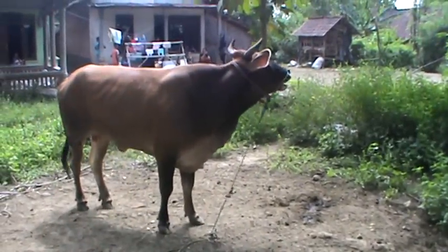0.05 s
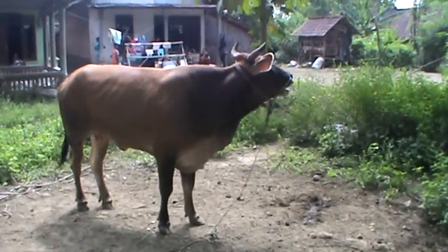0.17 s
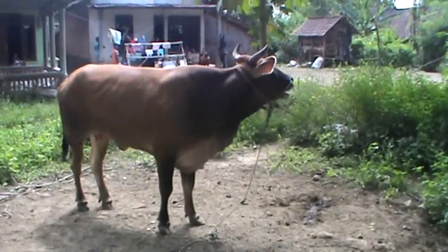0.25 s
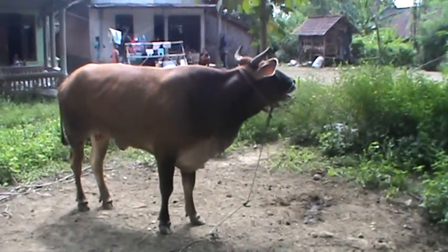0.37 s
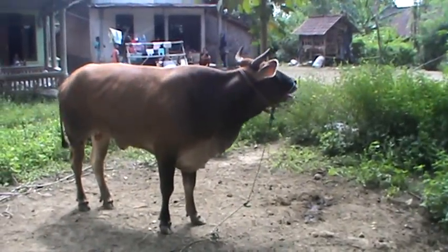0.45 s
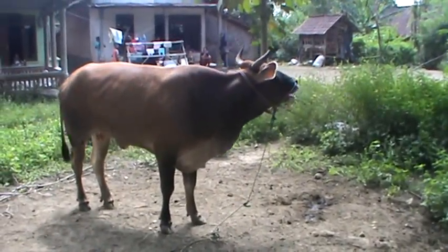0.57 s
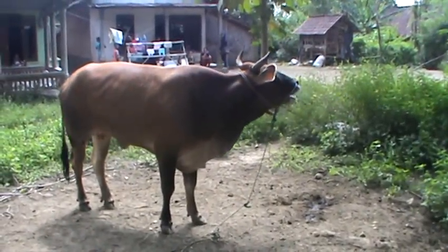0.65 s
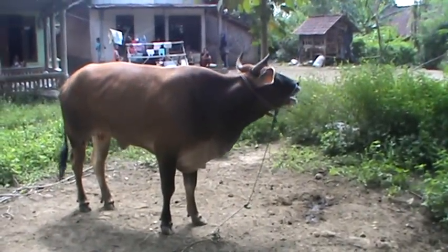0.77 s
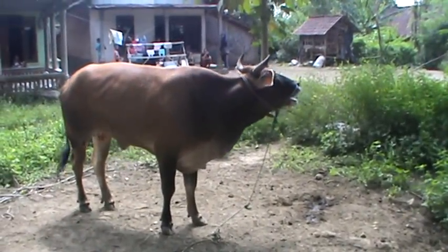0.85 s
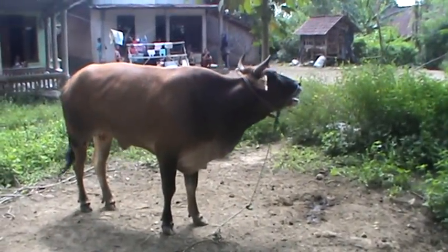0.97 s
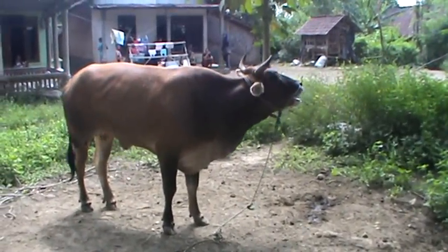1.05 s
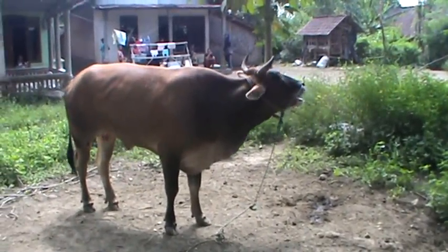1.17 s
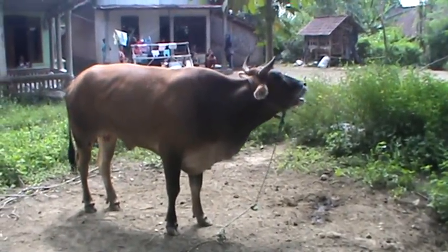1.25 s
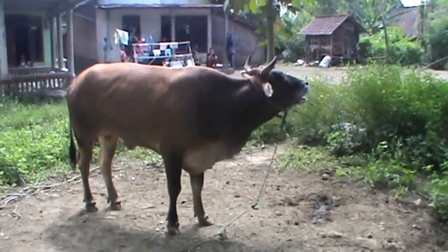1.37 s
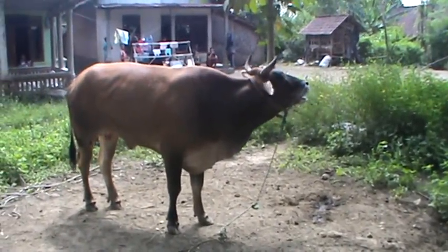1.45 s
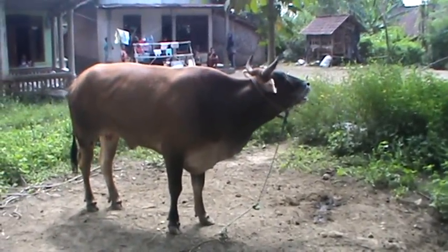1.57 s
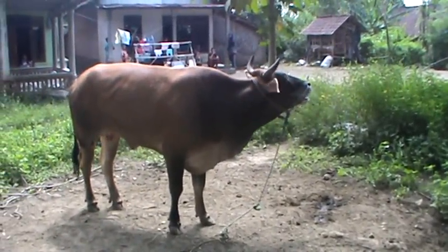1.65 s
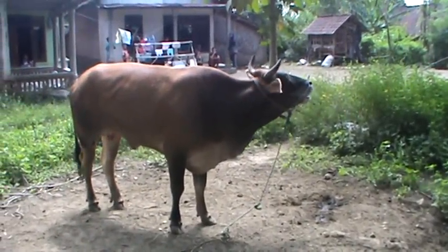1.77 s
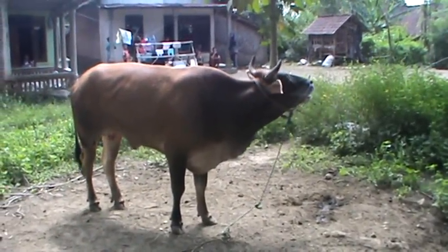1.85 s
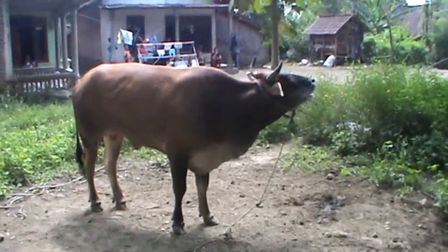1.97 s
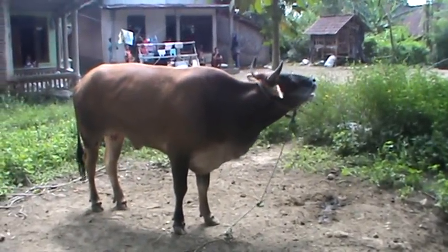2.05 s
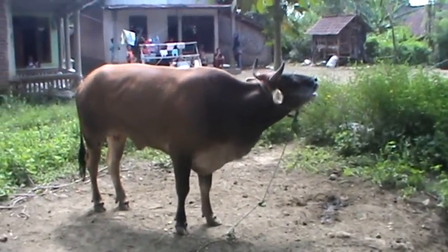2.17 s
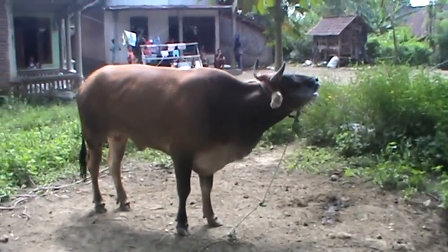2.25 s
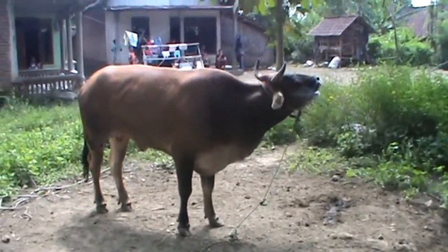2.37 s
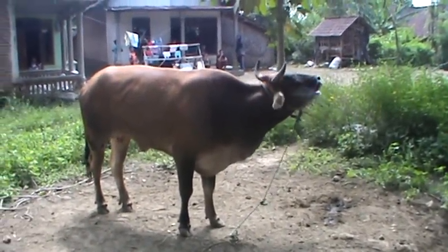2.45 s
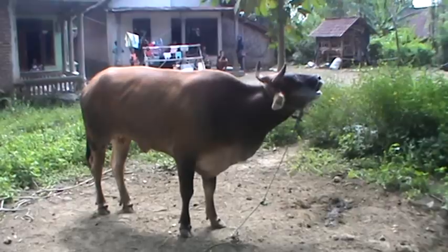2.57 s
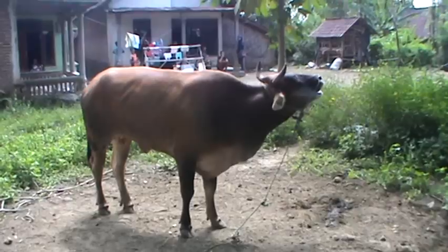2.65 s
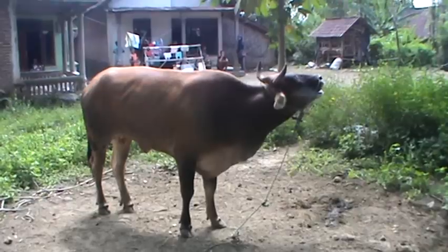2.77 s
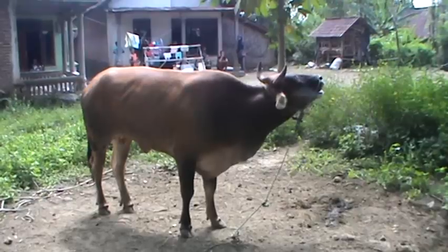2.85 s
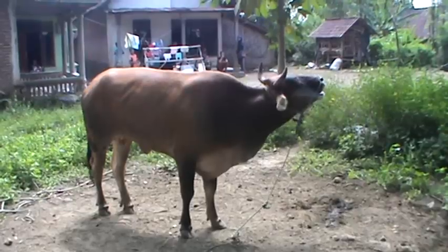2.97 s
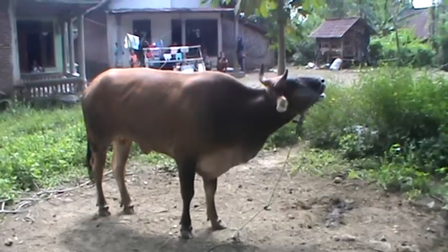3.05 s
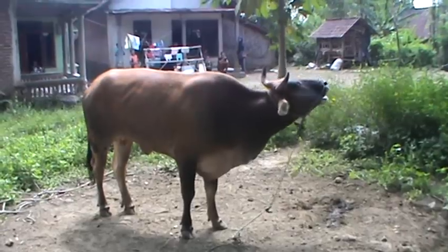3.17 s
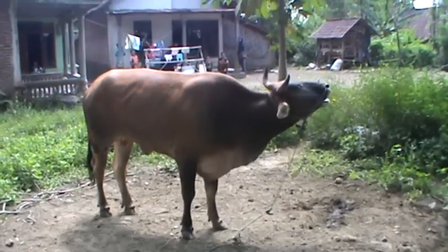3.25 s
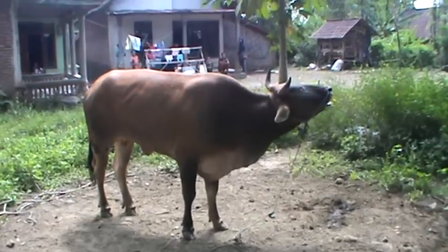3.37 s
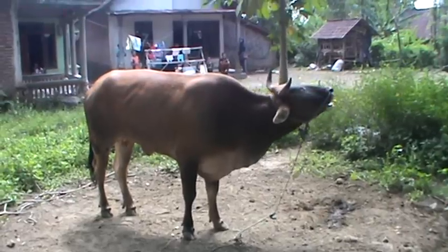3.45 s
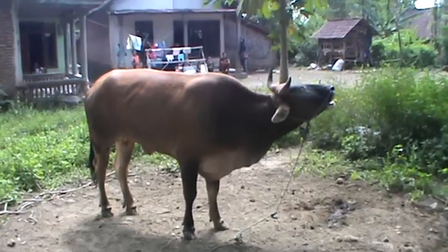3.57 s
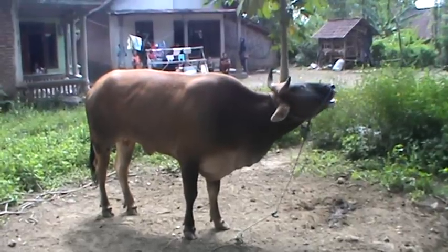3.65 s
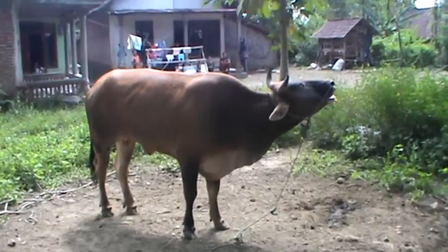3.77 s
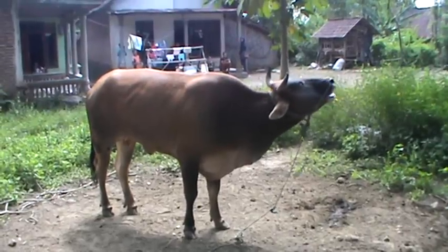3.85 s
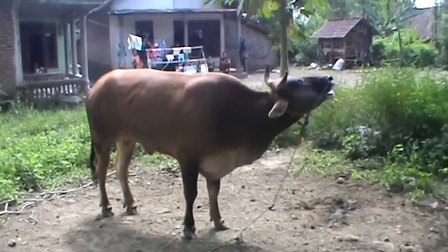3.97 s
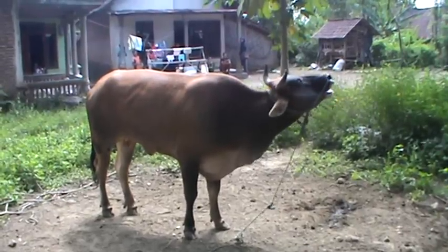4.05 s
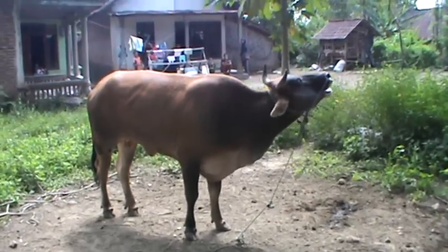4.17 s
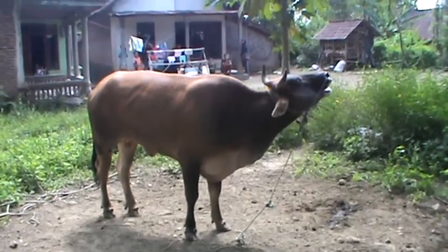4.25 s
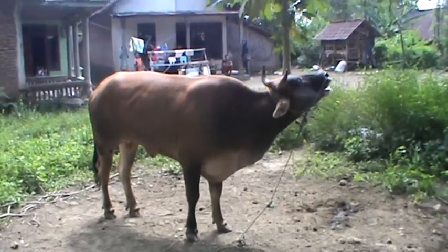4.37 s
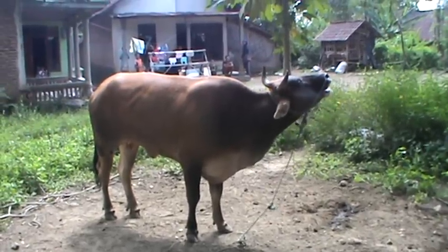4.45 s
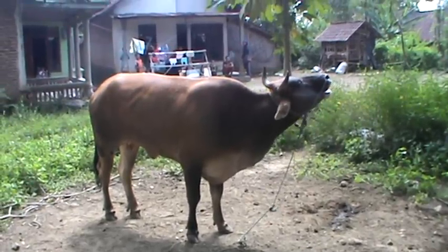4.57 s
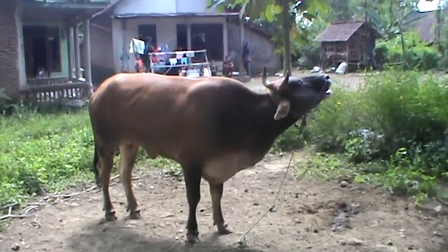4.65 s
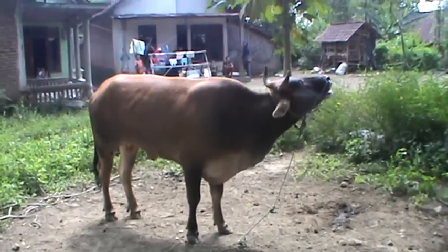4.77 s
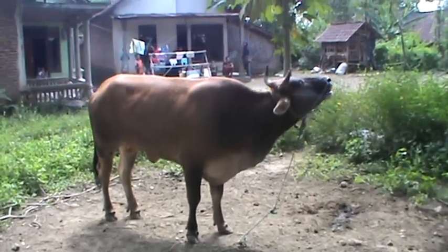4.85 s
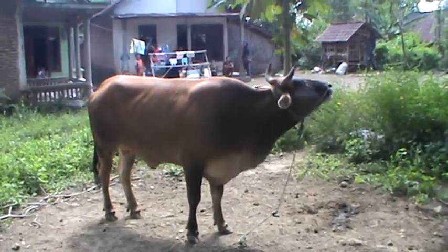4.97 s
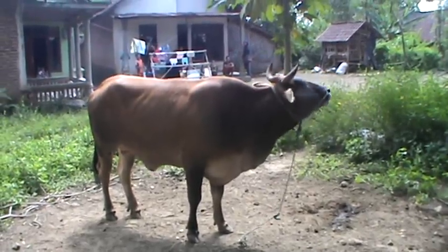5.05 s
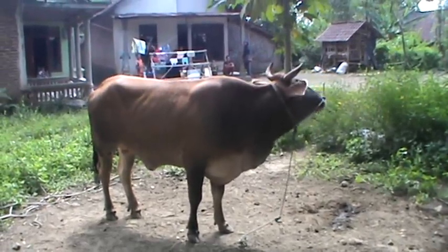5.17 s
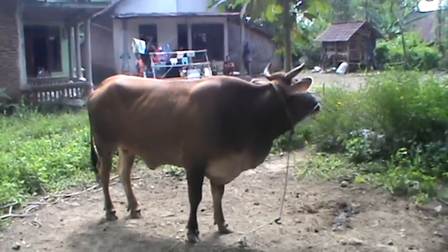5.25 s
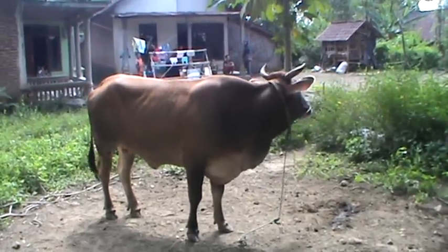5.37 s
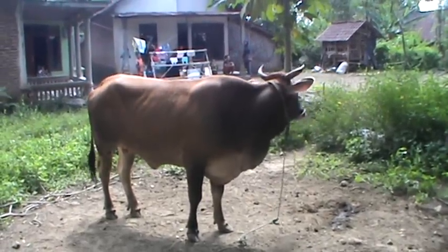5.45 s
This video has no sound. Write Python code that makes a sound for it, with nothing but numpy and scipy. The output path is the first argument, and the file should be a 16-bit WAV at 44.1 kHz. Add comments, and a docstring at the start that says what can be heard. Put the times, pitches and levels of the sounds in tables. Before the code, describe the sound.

In a quiet yard among houses, a cow lets out a single call of almost five seconds, slightly off to one side of the microphone. It starts high and strained, roughens, then falls into a low, wavering moo with a ragged break and a last swell. Faint, rasping bird chirps come from the bushes partway through. After the call cuts off, only soft open air and a faint high camera whine remain.

```python
"""A cow bellows once in a village yard, off the axis of the camera's microphone. Her vocal folds vibrate
in two ways and ring her throat: the voice leaps to a high trumpet, turns hoarse, drops to a low moo,
breaks again, then sags and swells before it stops. House walls answer faintly over the outdoor hush.
A small bird gives rasping, falling chirps in the bushes. Close to the microphone, a thin whine from
the camera itself sweeps slowly up and down."""
import sys
import numpy as np
from scipy import signal
from scipy.fft import rfft, irfft, next_fast_len
from scipy.io import wavfile
from scipy.ndimage import uniform_filter1d, map_coordinates

SR = 44100
rng = np.random.default_rng(int(sys.argv[2]) if len(sys.argv) > 2 else 0)


def output_pcm(signal):
    """Save a mono or channel-first signal as 16-bit PCM at the path in sys.argv[1].

    Samples are clipped to [-1, 1] before scaling.
    """
    pcm = np.clip(np.atleast_2d(signal).T, -1, 1) * 32767
    wavfile.write(sys.argv[1], SR, np.round(pcm).astype(np.int16))


N = 243285

# The folds' slow vibration, phrase by phrase. Each row: time in seconds, pitch in Hz.
TRUMPET_UNDERTONE = [(0, 153.5), (.1, 174.8), (.4, 198.7), (1.25, 196.9), (1.36, 177.8)]
FIRST_MOO_PITCH = [(1.42, 163.9), (1.544, 144.6), (1.608, 130.5), (1.676, 127.1), (1.856, 125.4),
                   (2.022, 131), (2.26, 147)]
BREAK_PITCH = [(2.45, 173.3), (2.621, 163.2)]
LONG_MOO_PITCH = [(2.73, 125.1), (2.756, 127.8), (2.94, 123.4), (3.116, 124.3), (3.302, 131.2),
                  (3.584, 123.9), (3.8, 120.5)]
CLOSING_PITCH = [(3.84, 114.5), (3.944, 100.5), (4.048, 97.4), (4.148, 99.47), (4.198, 103.8),
                 (4.408, 145.6), (4.534, 142.6), (4.632, 128.6), (4.722, 105.5), (4.79, 77.5)]
# Ways the folds vibrate. Each named row: weights in dB of slow vibration, fast vibration and rasp.
REGISTERS = { "split": (0, -5, -9), "trumpet": (-52, 0, -36), "strained": (-21, 0, -15),
             "hoarse": (-14, 0, -2.5), "roar": (-4, -3, 2), "moo": (0, -60, -26), "gruff": (0, -40, -15),
             "ragged": (0, -25, -10)}
# The voice slips between them. Each row: midpoint in seconds, length in seconds, new register.
SLIPS = [(0, .01, "split"), (0.121, 0.056, "trumpet"), (.385, .05, "hoarse"), (.76, .05, "roar"),
         (.815, 0.068, "hoarse"), (1.189, 0.078, "strained"), (1.327, 0.042, "split"), (1.44, .06, "gruff"),
         (1.6, .1, "moo"), (2.18, .14, "ragged"), (2.275, 0.053, "roar"), (2.738, .06, "gruff"),
         (2.821, 0.074, "moo"), (3.809, .05, "gruff"), (3.95, .08, "moo"), (4.222, .1, "gruff"),
         (4.361, .04, "ragged"), (4.6, .1, "gruff")]
# Jaw and tongue move two resonances. Each row: time in seconds, mouth in Hz, nasal in Hz.
VOWEL = [(1.4, 1093, 1483), (1.6, 1030, 1560), (1.85, 1020, 1640), (2.05, 1040, 1490), (2.2, 933, 1698),
         (2.6, 957, 1660), (3.1, 816, 1720), (3.35, 905, 1690), (3.6, 994, 1880), (3.8, 948, 1742),
         (3.92, 1032, 1700), (4.05, 920, 1736), (4.45, 908, 1560), (4.8, 1022, 1620)]
# The high register. Each entry: relative level of a harmonic in dB, from the fundamental up.
TRUMPET_HARMONICS = [11, -4, -7, -21.5, -13.5, -8.5, -31, -18.5, -30, -29, -24, -29, -36.5, -30.5, -14.5,
                     -24, -23.5, -31, -24, -19, -29.5, -25.5]
# Spectra of the slow pulses, the turbulence at the folds and the mouth's radiation.
# Each row: frequency in Hz, gain in dB.
PULSE_SPECTRUM = [(120, 3.5), (600, -9), (1100, -21), (1800, -30.5), (2200, -27.5), (2800, -32.5),
                  (3300, -30), (4500, -53), (5500, -36.5), (7000, -46)]
RASP_SPECTRUM = [(150, 5.5), (500, 1.5), (2000, -4), (3000, -1), (3900, 6), (4550, -5.5), (5300, -15.5),
                 (7000, -9), (12000, -16)]
RADIATION = [(150, -6.5), (200, -18), (240, 7.5)]
# Resonances of throat and muzzle. Each row: centre in Hz, width in Hz, gain in dB.
THROAT = [(242.7, 60.6, 6.5), (376, 140, -5.5), (530.8, 51.8, 11), (751.4, 32, 5.5), (861.4, 131, 1),
          (1045, 34.9, 10), (1280, 420, -9.5), (1512, 36, 2), (1640, 86, -4), (2008, 41, 1),
          (2183, 71, -15.5), (2550, 91, -23), (2707, 70, -23.5), (3320, 260, -32.5), (4462, 390, -12.5),
          (5800, 2100, -22), (8500, 830, -46), (10800, 3300, -43.5)]
# Bands of the voice. Each named row: lower edge in Hz, upper edge in Hz.
VOICE_BANDS = {"chest": (180, 340), "throat": (340, 650), "mouth": (650, 1150), "nasal": (1150, 2350),
               "edge": (2350, 12500)}
# The voice's body, below the mouth band, phrase by phrase. Each row: time in seconds, level in dB.
TRUMPET_LEVEL = [(0.0, -16.5), (0.09, -12), (0.684, -10), (0.798, -19), (0.838, -12), (1.26, -10),
                 (1.408, -15.5), (1.42, -21.5)]
FIRST_MOO_LEVEL = [(1.45, -22), (1.594, -12), (1.732, -18.5), (1.826, -18.5), (2.124, -12), (2.2, -19)]
BREAK_LEVEL = [(2.24, -21), (2.5, -20.5), (2.72, -19)]
LONG_MOO_LEVEL = [(2.76, -14), (2.852, -19), (3.358, -13.5), (3.57, -20), (3.676, -16), (3.77, -14),
                  (3.83, -18)]
CLOSING_LEVEL = [(3.86, -22), (3.898, -17.5), (4.254, -21), (4.368, -10.5), (4.418, -18), (4.592, -12),
                 (4.708, -18.5), (4.73, -15), (4.764, -20), (4.822, -44), (4.86, -36)]
# The breaking voice catches, lifting its body. Each row: time and half width in seconds, gain in dB.
CATCHES = [(2.281, .017, 7), (2.355, .014, 5), (2.485, .012, 3), (2.58, .022, 7), (2.63, .024, 7),
           (2.71, .014, 5)]
# The mouth band, early and late, and the nasal band. Each row: time in seconds, level in dB.
MOUTH_EARLY = [(0.0, -18.5), (0.35, -29.5), (0.69, -29), (0.74, -23), (1.26, -31), (1.39, -19),
               (1.57, -28.5), (1.61, -16.5), (1.75, -22), (2.05, -19), (2.21, -35), (2.29, -19)]
MOUTH_LATE = [(2.6, -22), (2.64, -21), (3.21, -28), (3.25, -20.5), (3.39, -22.5), (3.46, -31.5),
              (3.52, -23), (3.79, -30), (3.83, -17.5), (3.98, -31.5), (4.15, -28), (4.28, -15.5),
              (4.37, -35), (4.45, -19), (4.57, -21), (4.59, -31.5), (4.68, -18.5), (4.86, -55.5)]
NASAL_LEVEL = [(0.0, -25.5), (0.12, -25.5), (0.36, -21.5), (0.49, -26.5), (1.12, -27), (1.24, -25.5),
               (1.77, -38), (2.45, -27), (2.76, -33.5), (2.94, -41.5), (3.36, -30.5), (3.53, -34),
               (3.79, -25.5), (3.91, -35.5), (4.17, -35.5), (4.29, -29), (4.32, -33), (4.66, -32),
               (4.68, -27.5), (4.86, -53)]
# Weight of the lowest resonance within the body. Each row: time in seconds, gain in dB.
CHEST_WEIGHT = [(0, -6), (1.7, -15.5), (2.15, -7.5), (2.4, 1), (2.75, -2), (3.1, 6), (3.3, -9.5), (3.55, 1),
                (3.76, 14), (3.87, -2), (4.2, 6), (4.32, 3.5), (4.55, 0.5), (4.7, 4)]
# The weak fundamental radiating from the neck. Each row: pitch in Hz, gain in dB.
NECK = [(98, -39), (122, -41), (145, -49.5), (175, -43.5)]
# The cow at the two microphone ports. Each row: frequency in Hz, left's lead in radians.
PORT_PHASE = [(60, .1), (250, 0.83), (750, 1.14), (2000, 1.06), (4200, 1.07), (9000, 0.32)]
# Her balance between the ports. Each row: frequency in Hz, left minus right in dB.
PORT_BALANCE = [(200, 0.5), (600, -0.4), (740, 2), (830, 0.5), (1100, -3.5), (2400, -1.5), (4400, -2)]
# Outdoor hush and hiss. Each row: frequency in Hz, relative level in dB.
HUSH_SPECTRUM = [(25, -9), (80, -11.5), (270, -4), (480, -11), (720, -9), (1200, -17.5), (3000, -20.5),
                 (6000, -21), (12000, -24), (14000, -17.5), (15000, -35.5)]
# Stereo image of the hush. Each row: frequency in Hz, left-right likeness from 0 to 1.
HUSH_LIKENESS = [(60, 0.51), (130, 1), (290, 0.62), (640, 1), (1410, 1), (3100, 1), (6820, 0.096),
                 (15000, 1)]
# Fundamental of the camera's whine. Each row: time in seconds, level in dB.
WHINE_LEVEL = [(0, -54), (1.5, -59.5), (2.9, -54.5), (4.9, -56.5), (5.2, -52), (5.5, -50)]
# Its lower overtones. Each row: multiple of the fundamental, offset in Hz, rms level in dB.
WHINE_OVERTONES = [(1, 330, -71), (2, 0, -69), (3, 0, -76)]
# Reverberation among the houses. Each row: frequency in Hz, seconds to fall 60 dB.
WALL_DECAY = [(200, 0.7), (1500, 0.71), (7000, 0.15)]
# The bird's chirps. Each row: start in seconds, relative level in dB.
CHIRPS = [(1.714, -49.5), (1.92, -44.5), (2.0792, -46.5), (2.1893, -41.5), (2.3532, -42), (3.8107, -39.5),
          (4.0328, -36), (4.2063, -37), (4.351, -36), (4.463, -35.5), (4.6253, -35), (4.7315, -32),
          (4.8492, -33.5)]
SIDES = np.array([[.5], [-.5]])  # splits a difference between left and right


def amp(db):
    """Decibels to gain."""
    return 10 ** (np.asarray(db) / 20)


def unit(x):
    """x at rms 1."""
    return x / np.sqrt(np.mean(x ** 2) + 1e-20)


def along(points, hz):
    """Interpolate (Hz, value) points on a log axis."""
    f, v = np.transpose(points)
    return np.interp(np.log(hz + 1), np.log(f + 1), v)


def curves(*tables):
    """Join tables end to end; one value per sample for each column after the time."""
    s, *cols = np.vstack(tables).T
    return [np.interp(np.arange(N) / SR, s, c) for c in cols]


def bump(s, width_s):
    """A bell of height 1 around the time s."""
    return np.exp(-((np.arange(N) / SR - s) / width_s) ** 2)


def wobble(rate):
    """A smooth random curve, rate knots a second."""
    return map_coordinates(rng.standard_normal(int(N * rate / SR) + 4), [np.arange(N) * rate / SR])


def filtered(x, response):
    """x through a complex frequency response."""
    m = next_fast_len(N + SR // 2)
    return irfft(rfft(x, m) * response(np.fft.rfftfreq(m, 1 / SR)), m)[..., :N]


def band(hz, lo, hi, order=24):
    """Gain of a steep band-pass."""
    return (1 - 1 / (1 + (hz / lo) ** order)) / (1 + (hz / hi) ** order)


def steady(x, seconds):
    """x with its running rms held at 1."""
    size = int(seconds * SR)
    return x / np.sqrt(np.abs(uniform_filter1d(uniform_filter1d(x ** 2, size), size)) + 1e-12)


def pitches():
    """Slow and fast pitch of the folds in Hz; the fast one scoops up and slackens as breath is spent."""
    t = np.arange(N) / SR
    low_hz, = curves(TRUMPET_UNDERTONE, FIRST_MOO_PITCH, BREAK_PITCH, LONG_MOO_PITCH, CLOSING_PITCH)
    scoop_hz = 87.9 * np.exp(-t / .08)
    slack_hz = 17 * np.clip((t - 1.25) / .18, 0, 1)
    return uniform_filter1d(low_hz, size=SR // 30), 550.5 - scoop_hz - slack_hz


def register():
    """Weights in dB of the slow vibration, the fast one and the rasp; each holds until the next slip."""
    t = np.arange(N) / SR
    states = np.array([REGISTERS[name] for _, _, name in SLIPS], float)
    db = states[0][:, None] + np.zeros(N)
    for (s, length, _), step in zip(SLIPS[1:], np.diff(states, axis=0)):
        db += step[:, None] * np.clip((t - s) / length + .5, 0, 1)
    return db


def moo(turns, pitch_hz, mouth_db=10, nasal_db=11.5, mouth_width_hz=90, nasal_width_hz=52):
    """The low register's harmonics, lifted where the two moving resonances cross them."""
    mouth_hz, nasal_hz = curves(VOWEL)
    out = np.zeros(N)
    for k in range(1, 45):
        hz = k * pitch_hz
        lift_db = mouth_db / (1 + ((hz - mouth_hz) / mouth_width_hz) ** 2)
        lift_db += nasal_db / (1 + ((hz - nasal_hz) / nasal_width_hz) ** 2)
        # the pulse shape drifts, which the upper harmonics feel most
        drift = np.interp(np.arange(N), np.linspace(0, N, 45), rng.standard_normal(45))
        drift_db = 4.5 * min(k / 14, 1) * drift
        out += amp(along(PULSE_SPECTRUM, hz) + lift_db + drift_db) * np.cos(2 * np.pi * k * turns)
    return unit(out)


def trumpet(turns, breaking):
    """The high register's harmonics, sputtering when the fast vibration is about to break up."""
    tone = sum(amp(db) * np.cos(2 * np.pi * k * turns) for k, db in enumerate(TRUMPET_HARMONICS, 1))
    return unit(tone) * amp(3.9 * breaking * wobble(40))


def folds(low_hz, high_hz, register_db):
    """Two vibrations of the vocal folds plus their turbulence; also the slow one's cycle count."""
    low, high, rasp = amp(register_db)
    breaking = np.clip(register_db[2], 0, 1)  # the rasp outweighs the tone
    # the hoarser the voice, the less even its cycles
    slow_jitter = (.0006 + .025 * rasp) * wobble(160)
    fast_jitter = (.0003 + .011 * rasp) * wobble(220) + (.004 * rasp + .025 * breaking) * wobble(35)
    slow_turns = np.cumsum(low_hz * (1 + slow_jitter)) / SR
    fast_turns = np.cumsum(high_hz * (1 + fast_jitter)) / SR
    # at the top of the last swell every other pulse is weak
    doubling = 1 + .7 * bump(4.49, width_s=.06) * np.cos(np.pi * slow_turns)
    low_voice = low * moo(slow_turns, low_hz) * doubling
    # the slow vibration chops the fast one and puts sidebands on it
    pulse = np.cos(2 * np.pi * slow_turns)
    high_voice = high * trumpet(fast_turns, breaking) * (1 + .24 * low * pulse)
    air = filtered(rng.standard_normal(N), lambda hz: amp(along(RASP_SPECTRUM, hz)))
    puffs = (1 + .098 * pulse) * amp(1.5 * wobble(70))
    return low_voice + high_voice + rasp * unit(air * puffs), slow_turns


def throat(hz):
    """Response of throat and muzzle; the mouth radiates little below the lowest resonance."""
    ringing = sum((-1) ** k * amp(db) * 1j * hz * width / (centre ** 2 - hz ** 2 + 1j * hz * width)
                  for k, (centre, width, db) in enumerate(THROAT))
    return ringing * amp(along(RADIATION, hz))


def ground_bounce(hz, delay_s=.002267, strength=.31):
    """Response of the direct path to the microphone plus one bounce off the bare earth."""
    return 1 + strength * np.exp(-2j * np.pi * hz * delay_s)


def cow(stop_s=4.79, release_s=.05):
    """The folds ring the throat until they part; each band of the voice follows its own level."""
    t = np.arange(N) / SR
    low_hz, high_hz = pitches()
    low_db, _, rasp_db = register_db = register()
    source, slow_turns = folds(low_hz, high_hz, register_db)
    voiced = filtered(source, lambda hz: throat(hz) * ground_bounce(hz))
    chest, low_mid, mouth, nasal, edge = [
        filtered(voiced, lambda hz: band(hz, lo, hi)) for lo, hi in VOICE_BANDS.values()]
    chest_db, = curves(CHEST_WEIGHT)
    body = low_mid + amp(chest_db) * chest
    body_db, = curves(TRUMPET_LEVEL, FIRST_MOO_LEVEL, BREAK_LEVEL, LONG_MOO_LEVEL, CLOSING_LEVEL)
    body_db += sum(db * bump(s, width_s) for s, width_s, db in CATCHES)
    mouth_db, = curves(MOUTH_EARLY, MOUTH_LATE)
    nasal_db, = curves(NASAL_LEVEL)
    # the hissing edge follows the nasal band, grows with rasp and hardens as the voice tires
    edge_db = -25 + .72 * nasal_db + .18 * rasp_db + .83 * t
    edge_db += 8 * bump(4.385, width_s=.027)  # one scrape on the way up the last swell
    bands = [(body, body_db), (mouth, mouth_db), (nasal, nasal_db), (edge, edge_db)]
    call = sum(amp(db) * steady(x, seconds=.054) for x, db in bands)
    neck = amp(low_db + along(NECK, low_hz)) * np.sin(2 * np.pi * slow_turns)
    return (call + neck) * np.clip(1 - (t - stop_s) / release_s, 0, 1)


def microphone_ports(hz):
    """Response to the cow standing off axis: the two ports differ in level and phase."""
    return amp(SIDES * along(PORT_BALANCE, hz)) * np.exp(1j * SIDES * along(PORT_PHASE, hz))


def yard_hush(level_db=-51):
    """Faint open air around the microphone, alike on both sides in some bands and wide in others."""
    def mid_and_side(hz):
        angle = np.arccos(np.clip(along(HUSH_LIKENESS, hz), -1, 1)) / 2
        return amp(along(HUSH_SPECTRUM, hz)) * np.array([np.cos(angle), np.sin(angle)])
    mid, side = filtered(rng.standard_normal((2, N)), mid_and_side)
    return amp(level_db + .27 * wobble(1.7)) * unit(np.array([mid + side, mid - side]))


def camera_whine():
    """A tone inside the camera glides evenly up and down, under a high fizz and a steady whistle."""
    t = np.arange(N) / SR
    pitch_hz = 3384 + 19 * signal.sawtooth(np.pi * (t + .13), .5)
    turns = np.cumsum(pitch_hz) / SR
    base_db, = curves(WHINE_LEVEL)
    tones = amp(base_db + SIDES) * np.sin(2 * np.pi * turns)
    for k, offset_hz, db in WHINE_OVERTONES:
        tones += amp(db) * np.sin(2 * np.pi * (k * turns + offset_hz * t))
    # a flutter puts sidebands on the strong fourth harmonic
    flutter = .45 * np.sin(2 * np.pi * 330 * t) + .2 * np.sin(2 * np.pi * 165 * t)
    flicker = 1 + .35 * wobble(8) + .4 * wobble(28)
    sway = amp(1.5 * np.array([wobble(5), wobble(5)]) - SIDES)
    tones += amp(-48) * flicker * sway * np.sin(2 * np.pi * 4 * turns + flutter - SIDES / 2)
    fizz = unit(filtered(rng.standard_normal((2, N)), lambda hz: 1 / (1 + ((hz - 13450) / 480) ** 2)))
    whistle = np.sin(2 * np.pi * 15625 * t)
    return np.sqrt(2) * tones + amp(-58) * fizz + amp(-64) * whistle


def walls(x, delay_s=.008):
    """The scattered answer of houses and bushes, different at each microphone port."""
    hz, t, noise = signal.stft(rng.standard_normal((2, SR // 2)), SR, nperseg=256)
    decay = amp(-60 * t / along(WALL_DECAY, hz)[:, None])
    _, tail = signal.istft(noise * decay, SR, nperseg=256)
    delayed = np.pad(x, (int(delay_s * SR), 0))
    return signal.fftconvolve(delayed[None], tail / np.linalg.norm(tail[0]), axes=1)[:, :N]


def bird():
    """Each chirp from the bushes is a short, rasping band of sound that slides down."""
    song, t = np.zeros(N + SR), np.arange(SR // 5) / SR
    pitch_hz = 6600 + 900 * np.exp(-t / .017)
    slide = np.sin(2 * np.pi * np.cumsum(pitch_hz) / SR)
    swell = (t / .017) ** 2 * np.exp(2 - 2 * t / .018)
    for s, db in CHIRPS:
        grain = filtered(rng.standard_normal(len(t)), lambda hz: 1 / (1 + (hz / 850) ** 2))
        song[int(s * SR):][:len(t)] += amp(db - 8.5) * swell * unit(grain[:len(t)]) * slide
    return song[:N]


def scene():
    """From the camera: the cow off axis, the bird a little left, the walls and the hush all round."""
    call, chirps = cow(), bird()
    direct = filtered(call, microphone_ports) + chirps * amp(3 * SIDES)
    # the treble scatters more than the bass
    scattered = filtered(call, lambda hz: amp(along([(500, -23), (1500, -18), (5000, -11)], hz)))
    return direct + walls(scattered + amp(5.5) * chirps) + yard_hush() + camera_whine()


def record(dry):
    """The camera keeps nothing above its band limit."""
    return filtered(dry, lambda hz: hz < 15750)


dry = scene()
out = record(dry)
output_pcm(out)
```